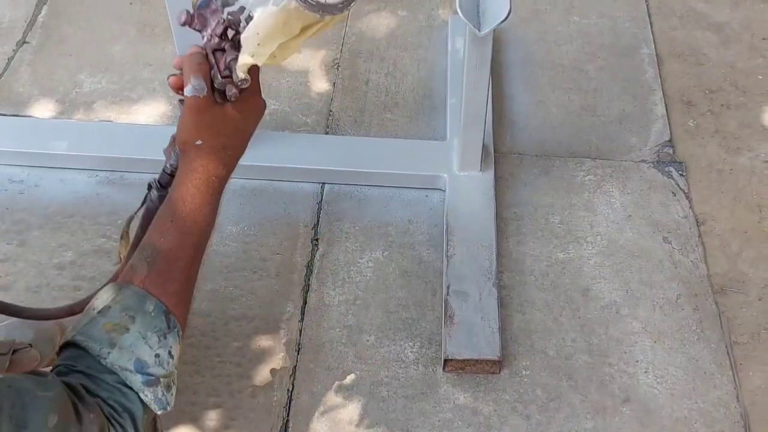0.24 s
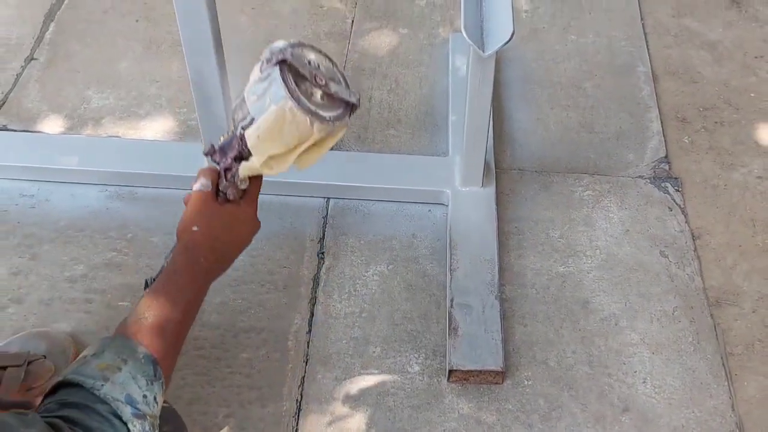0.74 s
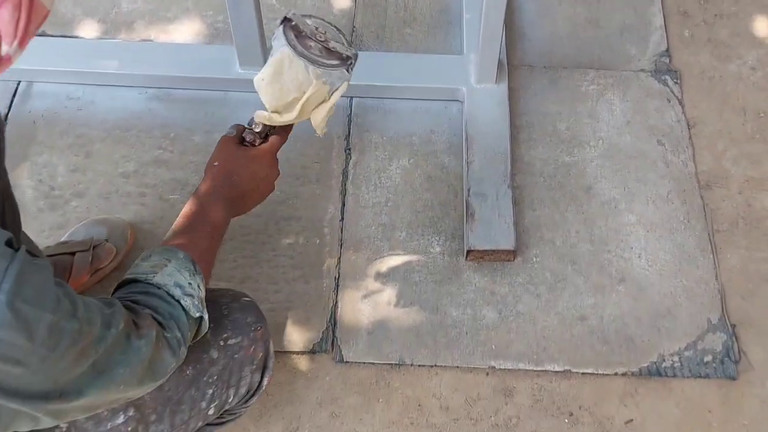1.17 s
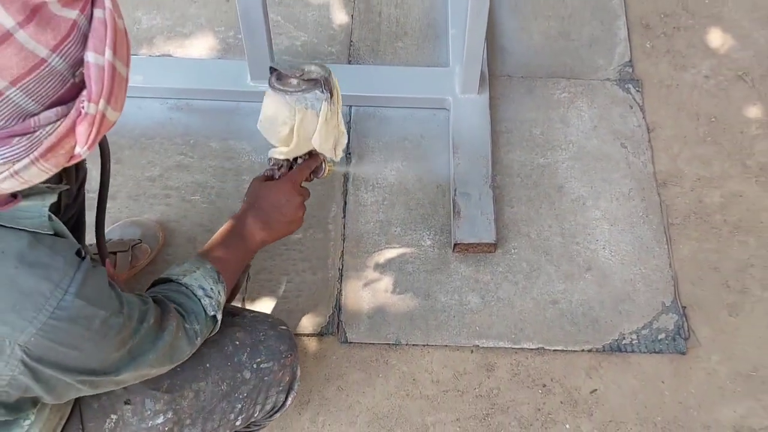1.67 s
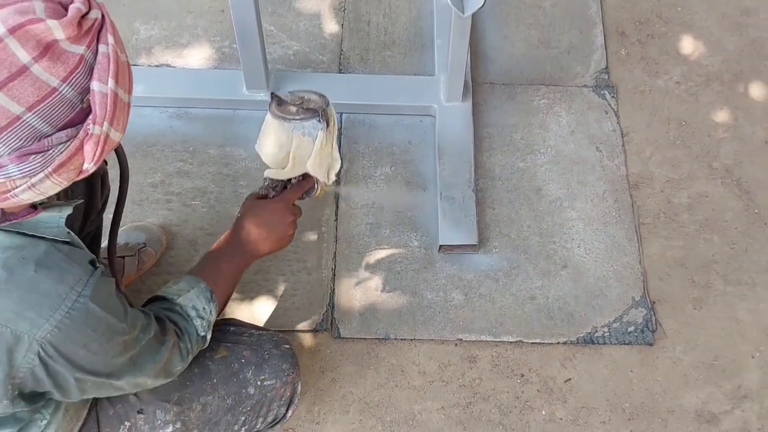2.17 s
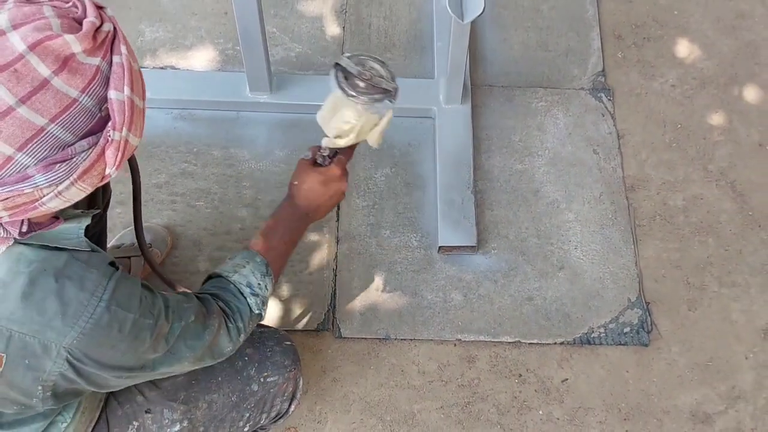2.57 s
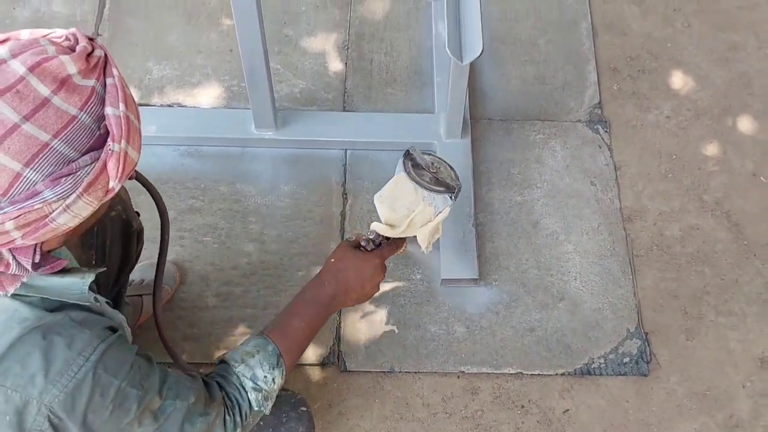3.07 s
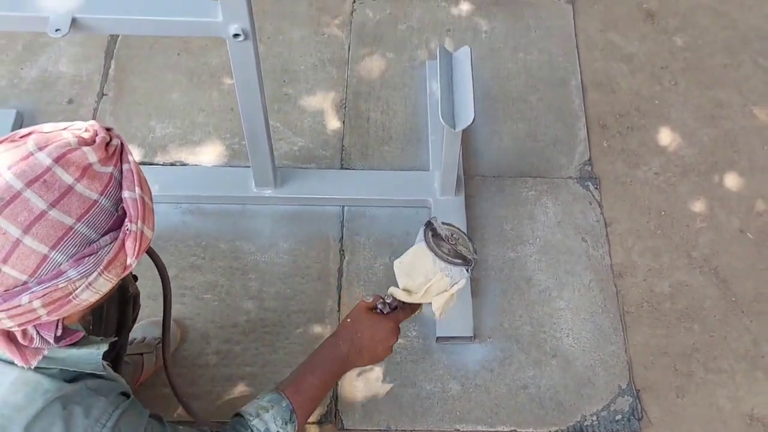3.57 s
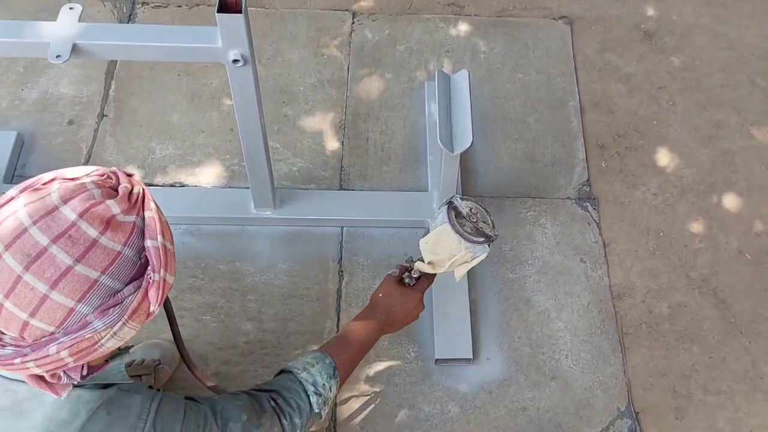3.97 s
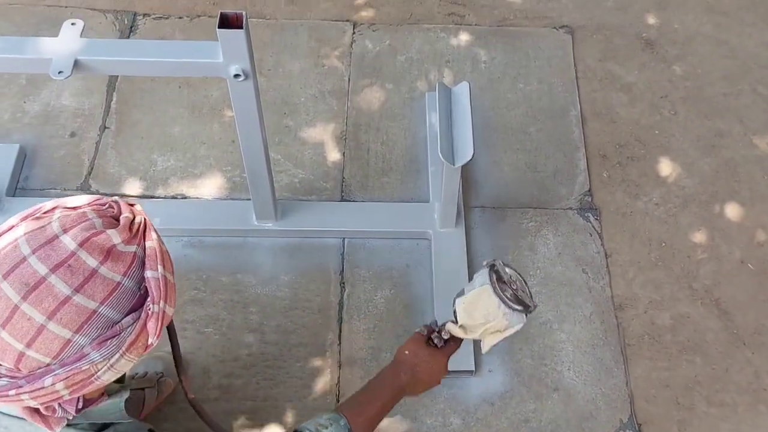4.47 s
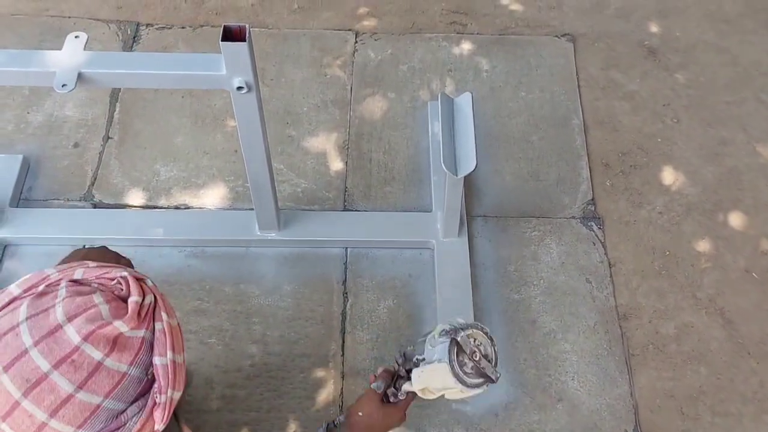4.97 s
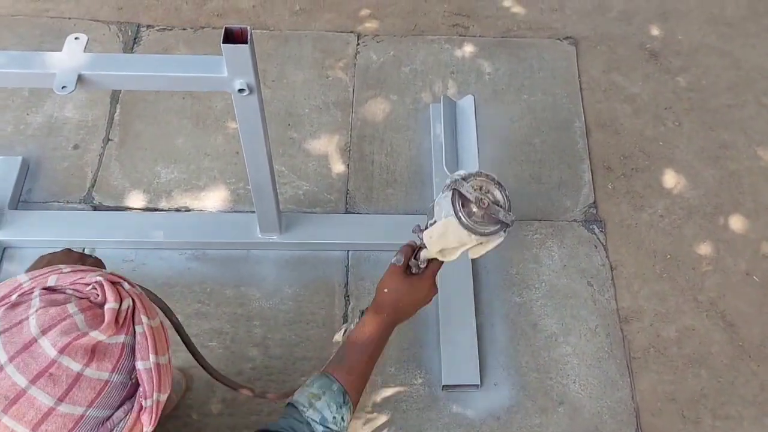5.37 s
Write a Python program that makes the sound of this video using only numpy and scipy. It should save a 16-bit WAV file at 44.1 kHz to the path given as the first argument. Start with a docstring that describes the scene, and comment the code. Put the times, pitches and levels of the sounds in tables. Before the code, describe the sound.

An air compressor chugs and rattles steadily outdoors while a paint spray gun hisses close by.

```python
"""Outdoors on concrete, a belt-driven piston compressor chugs some metres away to the right.
In each turn of its crank, a train of valve blows rings the tank and shakes a rattle out of the casing,
over a low rumble. Close by, the air jet of a spray gun hisses. The microphone shifts to face the
casing, and the rattle pulses more clearly. Sped-up playback makes the chug sound uneven."""
import sys
import numpy as np
from scipy import signal
from scipy.fft import irfft
from scipy.io import wavfile
from scipy.ndimage import uniform_filter1d

SR = 44100
rng = np.random.default_rng(int(sys.argv[2]) if len(sys.argv) > 2 else 0)


def master(y):
    """Save y as 16-bit WAV."""
    cut = np.clip(np.atleast_2d(y).T, -1, 1)
    pcm = np.round(cut * 32767)  # scale
    wavfile.write(sys.argv[1], SR, pcm.astype(np.int16))


N = 247842
TURNS_PER_S = 12.698  # speed of the crank between playback skips
TIME = np.arange(N) / SR


def gain_of(db):
    """Turns decibels into a factor to multiply by."""
    return 10 ** (np.asarray(db) / 20)


def unit_rms(x):
    """Scales a signal to an average strength (rms) of 1."""
    return x / np.sqrt(np.mean(abs(x) ** 2) + 1e-20)


def at_hz(table, hz):
    """Reads each column of a table at the given frequencies, on a log scale."""
    f, *columns = np.transpose(table)
    return [np.interp(np.log(hz + 1), np.log(f + 1), v)[:, None] for v in columns]


def at_time(table, t):
    """Reads each column of a table at the given times."""
    times, *columns = np.transpose(table)
    return [np.interp(t, times, v) for v in columns]


def grid(size):
    """Frequencies and times for sound cut into short, overlapping slices."""
    return np.fft.rfftfreq(size, 1 / SR), np.arange(N // (size // 4) + 5) * (size // 4) / SR


def stereo_noise(shape_db, hz, alike, lead_ms, side_db, patchy_db):
    """Noise shaped over frequency and time, with random louder patches; rms 1."""
    a, b, c, d, patches = rng.standard_normal(shape_db.shape[::-1] + (5,)).T
    patches = unit_rms(uniform_filter1d(uniform_filter1d(patches, size=6, axis=0), size=16, axis=1))
    left = a + 1j * b
    lead = np.exp(2j * np.pi * hz[:, None] * lead_ms / 1000)  # the right side hears it first
    right = alike * left * lead + np.sqrt(1 - alike ** 2) * (c + 1j * d)
    slices = np.array([left * gain_of(side_db / 2), right * gain_of(-side_db / 2)])
    slices *= gain_of(shape_db + patchy_db * patches)
    size = 2 * (len(hz) - 1)
    return unit_rms(signal.istft(slices, nperseg=size, noverlap=size - size // 4)[1][:, :N])


# The microphone's move: t/s, share done/0-1
MIC_MOVE = [(0, 0), (.9, 0.0), (1.6, 0.34), (2.4, 0.62), (3.1, 0.9), (3.8, 0.94), (4.6, 0.95), (5.62, 0.92)]
def mic_move(t):
    """How far the microphone has come round to face the casing."""
    return at_time(MIC_MOVE, t)[0]


# Playback is sped up by cutting out short bits, so the chug sounds uneven: t/s, jump/ms
PLAYBACK_SKIPS = [(0.126, 3.66), (0.154, 9.39), (0.223, 9.39), (0.383, 14.65), (0.502, 3.72),
                  (0.521, 14.47), (0.683, 14.92), (0.821, 14.85), (0.987, 7.3), (1.012, 9.25),
                  (1.172, 14.85), (1.311, 14.74), (1.429, 3.92), (1.497, 3.79), (1.519, 5.01),
                  (1.593, 9.39), (1.683, 15.49), (1.801, 9.23), (1.916, 11.56), (2.032, 19.73),
                  (2.218, 4.07), (2.261, 15.02), (2.427, 3.95), (2.472, 15.42), (2.613, 12.2),
                  (2.733, 4.78), (2.776, 11.47), (2.912, 11.52), (3.028, 19.57), (3.215, 3.88),
                  (3.262, 11.79), (3.379, 9.25), (3.448, 9.3), (3.539, 11.75), (3.657, 4.78), (3.704, 11.5),
                  (3.839, 11.54), (3.957, 19.61), (4.12, 11.81), (4.26, 11.95), (4.376, 9.25),
                  (4.445, 9.16), (4.562, 11.63), (4.676, 19.64), (4.889, 14.65), (5.027, 9.57),
                  (5.121, 11.77), (5.235, 9.18), (5.309, 4.94), (5.376, 4.76), (5.42, 11.66),
                  (5.538, 19.66)]
def crank(t, start_turns=.0168, blend_s=.012):
    """Turns made without and with the latest playback skip, and a 0-1 blend between the two."""
    skip_s, jump_ms = np.transpose(PLAYBACK_SKIPS)
    passed = np.searchsorted(skip_s, t + blend_s / 2)
    ahead_s = np.cumsum(np.r_[0, 0, jump_ms]) / 1000
    blend = np.clip((t - np.r_[-1, skip_s][passed]) / blend_s + .5, 0, 1)
    return [start_turns + TURNS_PER_S * (t + ahead_s[passed + k]) for k in (0, 1)] + [blend]


def swell(t, once_db, once_at, twice_db, twice_at):
    """Level in dB that rises and falls once and twice in each turn."""
    early, late, blend = crank(t)
    turns = early + blend * (late - early)
    once = once_db * np.cos(2 * np.pi * (turns - once_at))
    return once + twice_db * np.cos(4 * np.pi * (turns - twice_at))


def every_turn(harmonics, strengths, size=4096):
    """Builds one turn from tones at multiples of the crank speed and plays it over and over."""
    spectrum = np.zeros((2, size // 2 + 1), complex)
    spectrum[:, harmonics] = strengths
    one_turn = irfft(spectrum) * size / 2
    *turns, blend = crank(TIME)
    early, late = [np.array([np.interp(u % 1 * size, np.arange(size), side, period=size)
                             for side in one_turn]) for u in turns]
    return early + blend * (late - early)


# Tone of the rumble: f/Hz, relative level/dB
RUMBLE_TONE = [(20, -45), (45, -19), (65, -10), (100, -8), (170, -8), (274, -3), (450, -16), (580, -51),
               (990, -120)]
def rumble(level_db=-59):
    """Low noise of the running machine, carried through ground and yard."""
    hz, t = grid(size=2048)
    shape_db = at_hz(RUMBLE_TONE, hz)[0] + np.zeros_like(t)
    return gain_of(level_db) * stereo_noise(shape_db, hz, alike=.9, lead_ms=.11, side_db=-1.3, patchy_db=2)


# Tone of the air jet: f/Hz, relative level/dB
JET_TONE = [(4000, -18), (5800, -6.5), (8000, -6), (9600, -8.5), (12000, -3), (14200, -0.5), (15200, -1),
            (16500, -7)]
# How the jet wavers, in relative levels: t/s, whole hiss/dB, sizzle/dB, lower hiss/dB
JET_LEVELS = [(0.0, -65.5, -8, -4), (0.12, -67, -3, -3.5), (0.51, -70, 1, -1.5), (0.85, -61, -7, -7.5),
              (1.22, -64.5, -3, -4), (1.72, -62, -7, -9), (2.07, -68, 0, -2.5), (2.39, -61, -7, -10),
              (2.74, -62.5, -12, -8.5), (2.97, -63, -2, -3.5), (3.38, -63, -8, -8), (3.57, -64.5, -5, -4),
              (3.99, -61, -4, -6.5), (4.27, -66, 1, -2), (4.49, -61.5, -10, -6.5), (4.55, -69.5, 4, 0.5),
              (4.71, -64.5, -7, -3), (5.18, -66, -7, -3.5), (5.57, -66.5, -1, -3.5), (5.62, -66, -5, -2)]
def spray_gun(crest_db=2.5, crest_width_hz=900, sizzle_hz=12200, sizzle_width_hz=550, flutter_db=0.94):
    """The air jet makes a fine, fluttering hiss; its brightest band climbs as the microphone moves."""
    hz, t = grid(size=512)
    f = hz[:, None]
    levels = at_time(JET_LEVELS, t)
    hiss_db, sizzle_db, lower_db = [db - db.mean() for db in levels]
    crest_hz = 13300 + 1100 * mic_move(t)
    crest = np.exp(-((f - crest_hz) / crest_width_hz) ** 2)
    sizzle = np.exp(-((f - sizzle_hz) / sizzle_width_hz) ** 2)
    upper = np.clip((f - 9800) / 2200, 0, 1)
    flutter = unit_rms(uniform_filter1d(rng.standard_normal(len(t)), size=12))
    shape_db = at_hz(JET_TONE, hz)[0] + hiss_db + crest * crest_db + sizzle * sizzle_db
    shape_db += (1 - upper) * lower_db + flutter * flutter_db
    side_db = upper * (-3 - .5 * hiss_db)  # louder hiss lies further right
    hiss = stereo_noise(shape_db, hz, alike=.1, lead_ms=.03, side_db=side_db, patchy_db=1.44)
    return gain_of(levels[0].mean() + 7) * hiss


# Tone of the casing's rattle: f/Hz, relative level/dB
RATTLE_TONE = [(330, -32), (470, -4.5), (700, -6), (1100, -9.5), (1350, -9.5), (1600, -5.5), (2000, -7.5),
               (2250, -15), (3000, -14.5), (3700, -15.5), (4400, -13.5), (5200, -12.5), (5800, -26),
               (8000, -36)]
# What the microphone's move adds to it: f/Hz, level/dB
FACING_BOOST = [(450, -1), (900, 2.5), (1800, 2), (5000, 1.7)]
# How much of it repeats in every turn: f/Hz, share/0-1
RATTLE_REPEATS = [(450, .85), (900, .7), (1600, .4), (2500, .12), (4000, .02)]
# How alike it is left and right: f/Hz, likeness/0-1
RATTLE_ALIKE = [(450, .9), (880, .8), (1280, .68), (1820, .4), (2770, .25), (4430, .1)]
# Which side is louder: f/Hz, left over right/dB
RATTLE_SIDES = [(450, -1.5), (1200, 1.5), (2000, -4), (3300, 0.8), (6000, -1)]
# How strokes shake it: f/Hz, once-a-turn depth, place/turns, twice-a-turn depth, place/turns
RATTLE_SHAKES = [(546, 6, 0.78, -17, 0.53), (705, 4, 1, 6, 0.22), (860, 4, 1, -4, 0.094),
                 (1220, -1, 0.71, 7, 0.24), (1900, 2, 0.17, 3, 0.22), (2920, 2.5, 0.69, 2.5, 0.39),
                 (4260, 0.5, 0.5, 0, 0.25)]
def casing_noise(level_db=-58):
    """Valve and bearing noise in the sheet metal, shaken by each stroke, more clearly when faced."""
    hz, t = grid(size=512)
    move = mic_move(t)
    shake_db = (0.27 + 0.35 * move) * swell(t, *at_hz(RATTLE_SHAKES, hz))
    shape_db = at_hz(RATTLE_TONE, hz)[0] + shake_db + at_hz(FACING_BOOST, hz)[0] * move
    shape_db += 10 * np.log10(1 - at_hz(RATTLE_REPEATS, hz)[0])  # only the share that never repeats
    alike, side_db = at_hz(RATTLE_ALIKE, hz)[0], at_hz(RATTLE_SIDES, hz)[0]
    return gain_of(level_db) * stereo_noise(shape_db, hz, alike, lead_ms=.4, side_db=side_db, patchy_db=1.5)


def casing_clatter(level_db=-56.5, lead_s=0.00035):
    """The part of the casing's rattle that comes back alike in every turn."""
    harmonics = np.arange(30, 320)
    hz = harmonics * TURNS_PER_S
    tables = RATTLE_ALIKE, RATTLE_SIDES, RATTLE_TONE, FACING_BOOST, RATTLE_REPEATS
    alike, side_db, tone_db, boost_db, share = [at_hz(table, hz)[0][:, 0] for table in tables]
    left, unrelated = np.exp(2j * np.pi * rng.random((2, len(hz))))
    right = alike * left * np.exp(2j * np.pi * hz * lead_s) + np.sqrt(1 - alike ** 2) * unrelated
    sides = np.array([left * gain_of(side_db / 2), right * gain_of(-side_db / 2)])
    strengths = unit_rms(sides * gain_of(tone_db) * np.sqrt(share))
    before = every_turn(harmonics, strengths)
    after = every_turn(harmonics, strengths * gain_of(boost_db))
    clatter = (before + mic_move(TIME) * (after - before)) / np.sqrt(len(hz) / 2)
    return gain_of(level_db + swell(TIME, 2.73, 0.6, 0.54, 0.36)) * clatter


# Notes of the sheet metal: f/Hz, width/Hz, level before the move/dB, level after/dB,
# once-a-turn swell/dB, place/turns, twice-a-turn swell/dB, place/turns
PANEL_NOTES = [ (469.8, 186, -67.5, -59.5, 2.5, 1, -3.5, 0.47),
               (573, 5.5, -70, -68.5, -2.5, 0.92, -3, 0.75), (608, 14, -77, -61, 4.5, 0.4, -5, 0.36),
               (724, 14, -68, -66.5, 4, 0.82, 4, 0.35), (817, 25, -75.5, -69, 15, 0.63, 4, 0.36),
               (918, 44, -64.5, -77, 4, 0.37, -2, 0.25), (1045, 74, -74, -64, 2, 0.95, -2, 0.055),
               (1230, 124, -64, -63.5, 1.5, 0.6, 3.5, .03), (1641, 84, -64.5, -73.5, 4.5, 0.39, 2, 0.65),
               (1903, 80, -82, -63, 3, 0.47, -3.5, 0.21), (2035, 55, -68, -83, 4.5, 0.54, -4, 0.11),
               (2969, 65, -82.5, -76, 5.5, 0.64, -1.5, 0.072), (4987, 240, -73.5, -71.5, 2, 0.66, -4, 0.52),
               ]
def panels(lead_s=.00038, steadiness=.7):
    """Noise rings each metal panel around one note, which swells with every stroke."""
    out, move = np.zeros((2, N)), mic_move(TIME)
    for hz, width_hz, before_db, after_db, *throb in PANEL_NOTES:
        a, b, c, d = signal.lfilter([1], [1, -np.exp(-np.pi * width_hz / SR)], rng.standard_normal((4, N)))
        level_db = swell(TIME, *throb) + before_db + move * (after_db - before_db)
        tone = gain_of(level_db) * np.exp(2j * np.pi * hz * TIME)
        waver = unit_rms(a + 1j * b)
        waver = unit_rms(waver / (abs(waver) + 0.044) ** steadiness)  # even blows keep the ring going
        left, unrelated = waver * tone, unit_rms(c + 1j * d) * tone
        alike = at_hz(RATTLE_ALIKE, np.array([hz]))[0].item()
        right = alike * left * np.exp(2j * np.pi * hz * lead_s) + np.sqrt(1 - alike ** 2) * unrelated
        out += np.sqrt(2) * np.real([left, right])
    return out


# Valve blows in one turn: place/turns, brightness/dB per octave,
# relative level before the move/dB, after/dB, push (1) or pull (-1)
VALVE_BLOWS = [(0.0535, -2.2, 1.8, -2.8, -1.0), (0.1092, -8.3, -5.3, -3.1, -1.0),
               (0.3278, 6.6, -2.6, -6.5, 1.0), (0.4181, -12.4, -6.9, -6.4, -1.0),
               (0.6596, 4.8, 5.5, 5.7, -1.0), (0.7797, 0.4, 9.8, 9.8, 1.0)]
# Notes of tank and intake: f/Hz, time to fade by 60 dB/s,
# relative level before the move/dB, after/dB, direction of the first swing (1 or -1)
TANK_NOTES = [(81.5, 0.195, -55.4, -56.0, -1.0), (135.0, 0.522, -57.8, -60.4, -1.0),
              (191.2, 0.242, -49.5, -50.7, -1.0), (231.7, 0.24, -54.6, -54.2, 1.0),
              (260.1, 0.033, -37.0, -38.7, 1.0), (260.7, 0.96, -55.5, -56.1, -1.0),
              (306.9, 0.96, -56.8, -55.5, 1.0), (342.7, 0.64, -66.0, -83.9, 1.0),
              (354.8, 0.199, -62.0, -58.8, -1.0), (421.0, 0.215, -31.9, -32.2, 1.0),
              (422.9, 0.201, -32.1, -32.8, -1.0)]
# Where the tank is heard: f/Hz, left over right/dB, right side's head start/ms
TANK_DIRECTION = [(83, -2.5, 0.099), (146, 1, 0.59), (213, -2.5, 0.25), (255, 0.8, 0.12), (302, -2.5, 0.44),
                  (342, 0, 0.28), (400, 2.5, 0.37)]
def tank_chug(trim_before_db=0.54, trim_after_db=0.35):
    """The same train of valve blows rings tank and intake in every turn, like beats on a drum."""
    harmonics = np.arange(4, 38)
    hz, spin = harmonics * TURNS_PER_S, 2j * np.pi * harmonics[:, None]
    place, tilt_db, *blow_db, push = np.transpose(VALVE_BLOWS)
    note_hz, fade_s, *note_db, direction = np.transpose(TANK_NOTES)
    blows = push * np.exp(-spin * place) * gain_of(tilt_db * np.log2(hz[:, None] / 250))
    swing, decay = 2 * np.pi * note_hz, np.log(1000) / fade_s
    # how strongly each fading note answers each harmonic
    rings = direction * 2 * TURNS_PER_S * swing / ((decay + spin * TURNS_PER_S) ** 2 + swing ** 2)
    side_db, lead_ms = [v[:, 0] for v in at_hz(TANK_DIRECTION, hz)]
    left = gain_of(side_db / 2) * np.exp(-1j * np.pi * hz * lead_ms / 1000)
    chugs = []
    for trim, blow, note in zip((trim_before_db, trim_after_db), blow_db, note_db):
        strengths = gain_of(trim) * (blows @ gain_of(blow)) * (rings @ gain_of(note))
        chugs.append(every_turn(harmonics, strengths * [left, 1 / left]))
    before, after = chugs
    return before + mic_move(TIME) * (after - before)


def scene():
    """Compressor and spray gun together."""
    return tank_chug() + casing_clatter() + panels() + casing_noise() + rumble() + spray_gun()


def record(dry, cutoff_hz=15780):
    """Cuts away the very highest treble."""
    lowpass = signal.firwin(1023, cutoff_hz, window=("kaiser", 10), fs=SR)
    return signal.oaconvolve(dry, lowpass[None], "same")


dry = scene()
out = record(dry)
master(out)
```